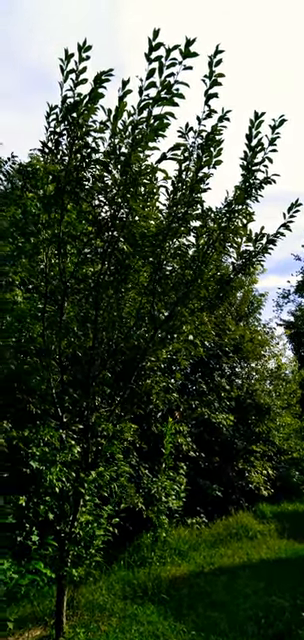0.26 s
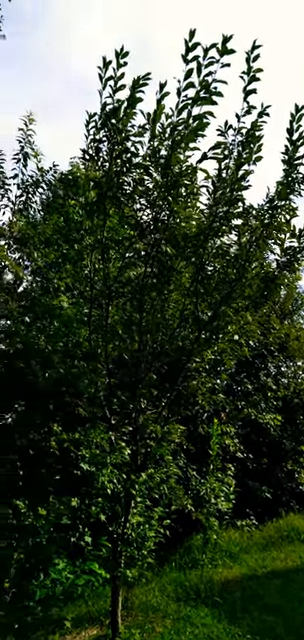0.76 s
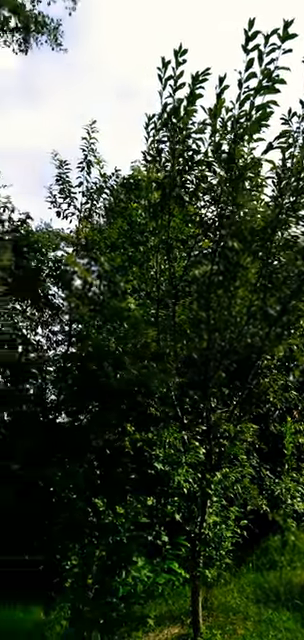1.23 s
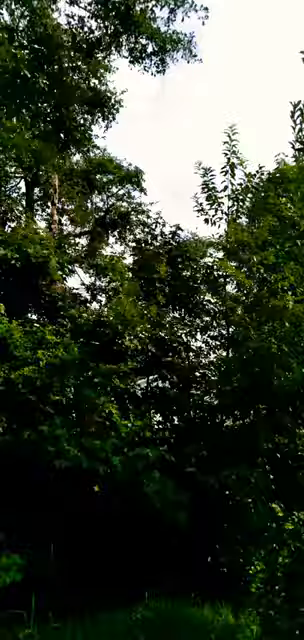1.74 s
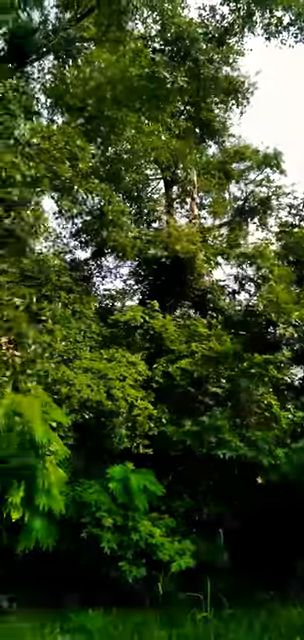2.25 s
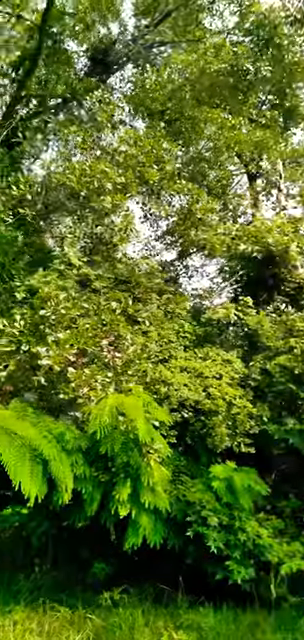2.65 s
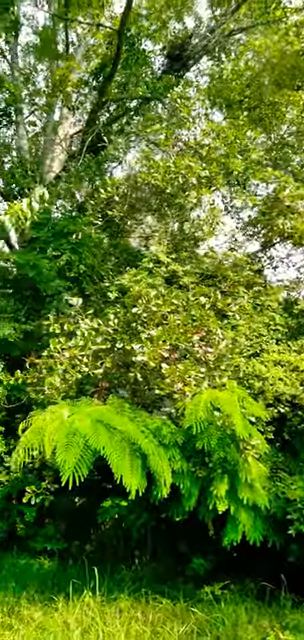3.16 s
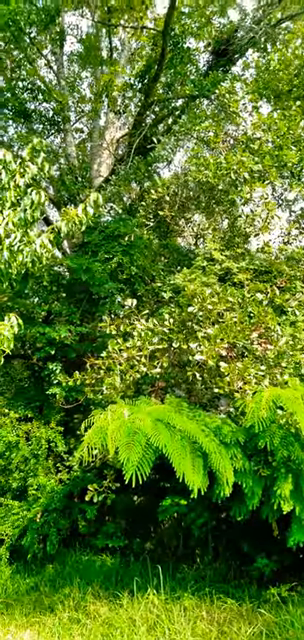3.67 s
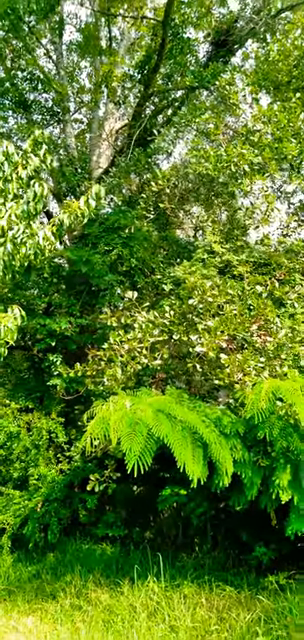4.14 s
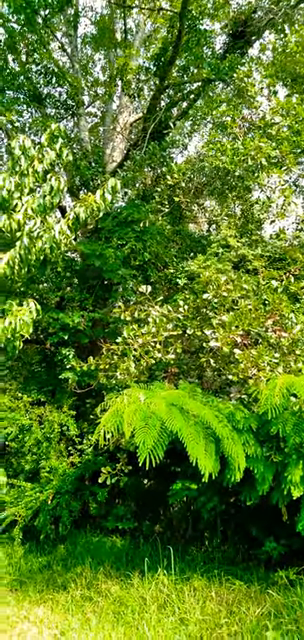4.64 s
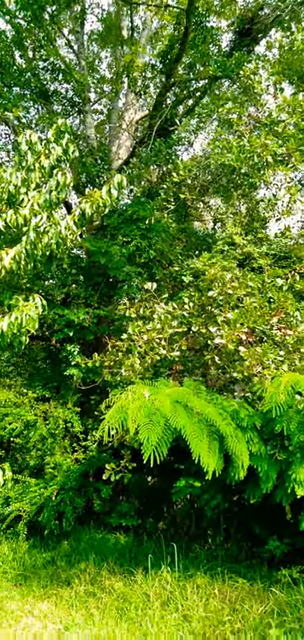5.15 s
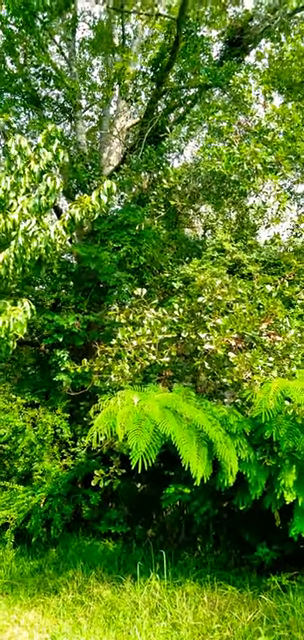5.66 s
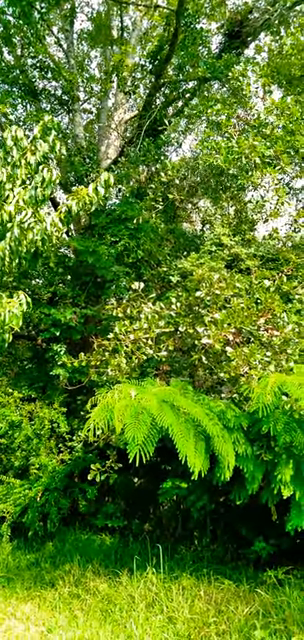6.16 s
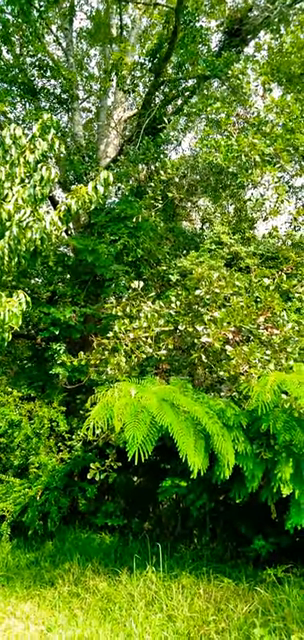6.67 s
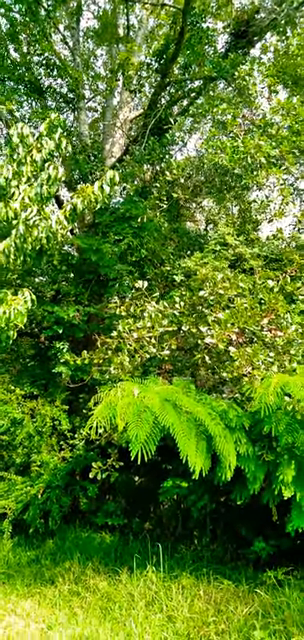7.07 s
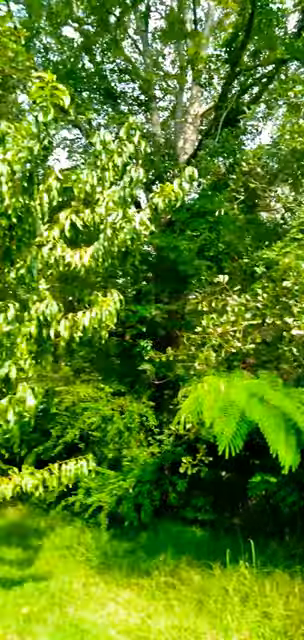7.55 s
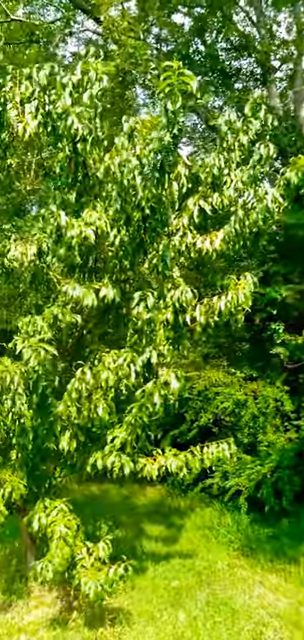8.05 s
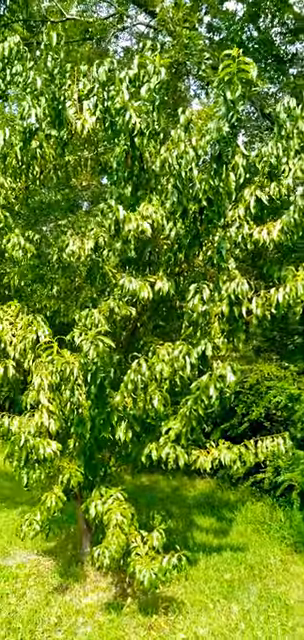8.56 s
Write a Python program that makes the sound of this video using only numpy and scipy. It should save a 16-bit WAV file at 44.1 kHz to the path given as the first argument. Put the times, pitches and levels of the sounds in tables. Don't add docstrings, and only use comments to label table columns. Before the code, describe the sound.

Loud raspy cicada buzz cuts off early among garden trees; thin high drones continue and swell over soft traffic rumble and echoing distant dog barks.

```python
import sys
import numpy as np
from scipy import signal
from scipy.fft import rfft, irfft, next_fast_len
from scipy.io import wavfile
from scipy.ndimage import uniform_filter1d, map_coordinates

SR = 44100
rng = np.random.default_rng(int(sys.argv[2]) if len(sys.argv) > 2 else 0)


def transcribe(u):
    v = np.clip(np.atleast_2d(u).T, -1, 1)
    q = np.round(v * 32767).astype(np.int16)
    wavfile.write(sys.argv[1], SR, q)


def ratio(d):
    e = np.asarray(d, float) / 20
    return 10 ** e


N = 388521


def unit(x):
    return x / np.sqrt(np.mean(x ** 2) + 1e-20)


def along(points, hz):
    f, v = np.transpose(points)
    return np.interp(np.log(hz + 1), np.log(f + 1), v)


def curves(rows):
    s, *cols = np.transpose(rows)
    return [np.interp(np.arange(N) / SR, s, c) for c in cols]


def sounding(rows, fade_s):
    t = np.arange(N) / SR
    since_start = t - rows[0][0] + (rows[0][0] <= 0)
    until_end = rows[-1][0] - t + (rows[-1][0] > 8.7)
    return np.clip(np.minimum(since_start, until_end) / fade_s, 0, 1)


def wobble(rate):
    coarse = np.arange(0, N + 64, 64)
    knots = rng.standard_normal(size=900)
    return np.interp(np.arange(N), coarse, map_coordinates(knots, [coarse * rate / SR]))


def filtered(x, response):
    m = next_fast_len(N + SR // 2)
    return irfft(rfft(x, m) * response(np.fft.rfftfreq(m, 1 / SR)), m)[..., :N]


def body(points):
    return lambda hz: ratio(along(points, hz)) * (hz > points[0][0]) * (hz < points[-1][0])


def sac(centre_hz, width_hz, skirt_db):
    def response(hz):
        bell = np.exp(-.5 * ((hz - centre_hz) / width_hz) ** 2)
        return bell + ratio(skirt_db) / (1 + ((hz - centre_hz) / 900) ** 2)
    return response


def placed(at, size):
    at = np.clip(at, 8, N - 9)
    near = np.floor(at)[:, None] + np.arange(-7, 9)
    offset = near - at[:, None]
    shape = np.sinc(offset) * np.cos(np.pi * offset / 16) ** 2
    return np.bincount(near.astype(int).ravel(), (shape * size[:, None]).ravel(), N)


def clicks(rate_hz, drift, jitter_s, scatter_db, pattern_db=(0,), ahead=0):
    turns = np.cumsum(rate_hz * (1 + drift * wobble(0.99))) / SR + ahead
    k = np.arange(1, int(turns[-1]))
    luck = rng.standard_normal((16000, 2))[:len(k)]
    at = np.interp(k, turns, np.arange(N)) + jitter_s * SR * luck[:, 0]
    level_db = np.asarray(pattern_db)[k % len(pattern_db)] + scatter_db * luck[:, 1]
    return placed(at, ratio(level_db))


def echoes(x, t60, wet_db, sway):
    t = np.arange(int(.8 * SR)) / SR
    tails = rng.standard_normal((4, len(t))) * ratio(-60 * t / abs(t60))
    paths = signal.fftconvolve(x[None], tails / np.linalg.norm(tails[0]), axes=1)[:, :N]
    turn = sway * np.arange(N) / SR + wobble(2.024)
    return x + ratio(wet_db) * (np.cos(turn) * paths[:2] + np.sin(turn) * paths[2:])


def foliage(x, spread_s, change_s, wet_db, fading=.25):
    _, t, z = signal.stft(x, SR, nperseg=2048, noverlap=1536)
    chance = rng.standard_normal((4, 1050, 768))
    delay, rate = np.fft.fftfreq(1050, SR / 2048), np.fft.fftfreq(768, t[1])
    smooth = np.exp(-.5 * (delay[:, None] / spread_s) ** 2 - .5 * (rate * change_s) ** 2)
    field = np.fft.ifft2((chance[:2] + 1j * chance[2:]) * smooth)[:, :z.shape[0], :z.shape[1]]
    field = field / np.abs(field) ** (1 - fading)
    wet = signal.istft(z * field, SR, nperseg=2048, noverlap=1536)[1][:, :N]
    both = unit(x) + ratio(wet_db) * unit(wet)
    return both / np.sqrt(np.abs(uniform_filter1d(both ** 2, size=5000)) + 1e-9)


def place(pair, level_db, pan_db):
    left, right = unit(pair[0]), unit(pair[1])
    return np.array([left * ratio(level_db + pan_db / 2), right * ratio(level_db - pan_db / 2)])


def late_left(pair):
    return np.array([np.roll(pair[0], 4), pair[1]])


def rush(spectrum, alike, lag, patchy_db):
    z = signal.stft(rng.standard_normal((2, N)), nperseg=512)[2]
    field = uniform_filter1d(rng.standard_normal(z.shape[1:]), size=6, axis=0)
    field = uniform_filter1d(field, size=14, axis=1)
    pair = signal.istft(z * ratio(patchy_db * unit(field)), nperseg=512)[1][:, :N]

    def mid_side(hz):
        turn = np.arccos(np.clip(along(alike, hz), -1, 1)) / 2
        return body(spectrum)(hz) * [np.cos(turn), np.sin(turn)]
    mid, side = filtered(pair, mid_side)
    left = filtered(mid + side, lambda hz: np.exp(-2j * np.pi * hz * lag / SR))
    return unit(np.array([left, mid - side]))


def air():
    # hz, level_db per Hz
    air_spectrum = [(130, -2.5), (205, -6), (450, -1), (1100, -1.5), (2000, -6), (3100, -7), (6000, -3.5),
                    (8000, -24), (9700, -2.5), (11600, -36), (13500, -14), (15600, -10.5)]
    # hz, likeness (-1 to 1)
    air_alike = [(60, 0.94), (180, 0.94), (550, 1), (1650, 0.66), (4970, 0.2), (15000, -0.05)]
    level = ratio(-63.5 + 0.15 * wobble(2.02))
    return level * rush(air_spectrum, air_alike, lag=3.07, patchy_db=1.34) * ratio([[1.2], [-1.2]])


def road():
    # hz, level_db per Hz
    rumble = [(28, -44), (45, -14.5), (62, -4.5), (100, -1.5), (140, -8.5), (190, -22), (240, -16)]
    # hz, likeness (0-1)
    road_alike = [(30, .55), (120, .75)]
    # middle_s, half_length_s, level_db
    passes = [
        (1.9, 0.13, -72),
        (2.904, 0.072, -65.5),
        (3.798, 0.33, -63.5),
        (5.214, 0.3, -66.5),
        (6.033, 0.27, -57.5),
        (7.37, 0.23, -63),
        (8.21, 0.22, -65),
    ]
    t = np.arange(N) / SR
    power = ratio(-68.5) ** 2
    for s, half_s, db in passes:
        power = power + ratio(db) ** 2 * np.exp(-((t - s) / half_s) ** 2)
    sway = ratio(2 * wobble(8) - 1.5)
    noise = rush(rumble, road_alike, lag=1.8, patchy_db=0.5)
    return np.sqrt(power) * sway * noise * ratio([[1.5], [-1.5]])


def engines():
    # time_s, pitch_hz, level_db
    firing_notes = [
        [(5.4, 84.83, -75), (5.75, 97.33, -54.5), (5.9, 107.4, -56), (6.3, 106.1, -57), (6.6, 107, -76)],
        [(6.7, 140.4, -89), (7.2, 140, -67), (7.65, 142.5, -64.5), (7.8, 140.4, -74.5), (8.3, 141, -56),
         (8.55, 142, -84)],
        [(7.95, 212.3, -85), (8.2, 229.7, -66.5), (8.45, 232, -74), (8.81, 230, -85)],
    ]
    out = 0
    for rows in firing_notes:
        hz, db = curves(rows)
        turn = 2 * np.pi * np.cumsum(hz * (1 + 0.01017 * wobble(3.9))) / SR
        note = ratio(db + 2.4 * wobble(9)) * np.sin(turn)
        out = out + sounding(rows, 0.044) * note * ratio([[2.5], [-2.5]])
    return out


def hand():
    # middle_s, peak_db, pitch_hz
    bumps = [
        (5.822, -49.5, 158),
        (6.267, -43.5, 109),
        (7.08, -58, 159),
    ]
    t, out = np.arange(N) / SR, np.zeros(N)
    for s, db, hz in bumps:
        out += ratio(db) * np.exp(-.5 * ((t - s) / 0.0049) ** 2) * np.sin(2 * np.pi * hz * (t - s))
    return out * ratio([[3], [-3]])


def bird():
    # start_s, length_s, from_hz, to_hz, level_db
    chirps = [
        (5.093, .03, 6260, 7050, -66),
        (5.184, 0.023, 6020, 6430, -63),
        (5.27, 0.015, 5720, 6500, -61),
        (5.368, 0.016, 5640, 5920, -63),
        (5.867, 0.026, 6140, 7260, -55.5),
        (3.25, 0.64, 3140, 3230, -70.5),
        (4.385, 0.42, 2500, 2650, -74),
        (7.482, 0.19, 4520, 4540, -76),
    ]
    t, out, waver_hz = np.arange(N) / SR, np.zeros(N), 75 * wobble(55)
    for s, length, from_hz, to_hz, db in chirps:
        u = np.clip((t - s) / length, 0, 1)
        turn = 2 * np.pi * np.cumsum(from_hz + (to_hz - from_hz) * u + waver_hz) / SR
        out += ratio(db) * np.sin(np.pi * u) ** 0.15 * np.sin(turn)
    return echoes(out, t60=0.41, wet_db=4.0, sway=0.18) * ratio([[3], [-3]])


def dog():
    # start_s, level_db, voice_hz, chest_db, roughness (0-1)
    barks = [
        (2.045, -51.5, 934, -12.5, 0.41),
        (2.658, -52.5, 875, -2.5, 0.38),
        (4.6, -58, 834.5, 5.5, 0.77),
        (8.48, -70.5, 792, -25, 0.77),
    ]
    t, low, high = np.arange(SR // 2) / SR, np.zeros(N + SR), np.zeros(N + SR)
    for s, db, hz, chest_db, rough in barks:
        pitch_rasp, chest_rasp, level_rasp = [wobble(140)[:len(t)] for _ in range(3)]

        def swell(lag_s):
            rise_fall = np.sin(np.pi * np.clip((t - lag_s) / 0.3, 0, 1) ** 0.5) ** 2
            return ratio(db + 6 * rough * level_rasp) * rise_fall
        pitch = 1 - .16 * rough * np.exp(-t / .09) + .065 * rough * pitch_rasp
        turn = 2 * np.pi * np.cumsum(pitch) / SR
        chest = np.sin(2 * np.pi * np.cumsum(553.5 * (1 + .055 * chest_rasp)) / SR)
        chest = ratio(chest_db - 103 * t) * swell(-0.014) * chest
        husk = ratio(-8) * swell(0.07) * np.sin(1014 * turn)
        voice = swell(0.018 + 0.032 * rough ** 2) * np.sin(hz * turn)
        octave = swell(0.048) * ratio(-9.5) * np.sin(2 * hz * turn)
        low[round(s * SR):][:len(t)] += voice + husk + chest
        high[round(s * SR):][:len(t)] += octave
    left, right = echoes(low[:N], t60=1.1, wet_db=6, sway=.3) + echoes(high[:N], t60=.5, wet_db=4, sway=.3)
    return np.array([ratio(1.2) * np.roll(.72 * right + .45 * left, 3), ratio(-1.2) * right])


def katydid_beat():
    # time_s, slip_beats
    throb_slip = [(1.4, -.08), (2.9, -.2), (3.8, -.8), (4.3, -1.5)]
    turn = 14.1 * np.arange(N) / SR + curves(throb_slip)[0]
    return (.5 + .5 * np.cos(2 * np.pi * turn)) ** 3.3


def katydid(beat):
    # time_s, level_db
    throb = [(1.4, -72), (1.8, -61), (2.2, -59), (2.6, -63), (2.9, -71), (3.3, -83), (3.9, -78), (4.3, -84)]
    # hz, level_db per Hz
    throb_body = [(3800, -23), (4300, -7.5), (4800, -9), (5100, 5), (5450, -13), (6100, -1), (6700, -6),
                  (7100, -12)]
    teeth = clicks(900, drift=.02, jitter_s=0.00034, scatter_db=3.5)
    rasp = echoes(filtered(teeth * beat, body(throb_body)), t60=0.046, wet_db=0.5, sway=3.2)
    return sounding(throb, 0.21) * place(rasp, curves(throb)[0], 9.3)


def far_buzzers(beat):
    # time_s, level_db, left_right_db
    far_path = [(1.2, -46, 13), (1.45, -50.5, 6), (2.0, -52, 4.5), (2.7, -53.5, 8.5), (3.2, -56, 8),
                (4.0, -61, 9), (4.5, -68.5, 10), (5.2, -74, 0)]
    # hz, level_db per Hz
    far_body = [(2200, -19), (3600, -14), (4600, -14.5), (5200, -6), (6800, -5), (7600, -2.5),
                (8700, -15.5), (10500, -21), (12300, -19), (14000, -37)]
    far = filtered(clicks(480, drift=.01, jitter_s=0.0001365, scatter_db=2.5), body(far_body))
    far = foliage(far * ratio(1.06 * wobble(24.96)), spread_s=0.0077, change_s=0.46, wet_db=11, fading=0.79)
    level_db, pan_db = curves(far_path)
    return sounding(far_path, 0.34) * place(far * (1 + 0.044 * beat), level_db + 2.0, pan_db)


def crowd():
    # time_s, level_db
    crowd_level = [(0.0, -50), (1.4, -51), (3.0, -52), (4.3, -51), (6.8, -49), (8.81, -51.5)]
    many = clicks(1500, drift=0.018, jitter_s=0.00055, scatter_db=3.0) * ratio(0.49 * wobble(40))
    many = filtered(many, sac(8010, 340, skirt_db=-4.5))
    many = foliage(many, spread_s=0.013, change_s=0.15, wet_db=3)
    return late_left(place(many, curves(crowd_level)[0], 0.5))


def steady_singer():
    # time_s, level_db, left_right_db
    song = [(5.2, -78, -6), (6, -72, -24), (6.5, -65, -22.5), (7, -52.5, -10), (7.5, -54.5, -4.5),
            (7.9, -55.5, 2), (8.3, -55.5, -1), (8.81, -53.5, -6)]
    # hz, level_db
    low_band = [(4400, -20), (5000, -11), (5450, -13), (5750, 0), (6250, -1.5), (6750, 4.5), (7000, 1),
                (7600, -30)]
    # hz, level_db
    top_band = [(8700, -10), (9300, -0.5), (9900, -15.5), (10500, -2.5), (11100, -8.5), (11700, -33)]
    # time_s, comb_db
    opening = [(5.2, -22), (6.6, -19), (7.3, -5.5), (7.9, 2.5), (8.81, 0.5)]
    # hz, level_db
    first_lines = [(6500, 1), (10500, -10.5)]
    # time_s, level_db
    young = [(5.2, -81), (5.65, -72), (6.4, -70.5), (7.2, -65.5), (8.81, -82)]
    # time_s, level_db
    passing = [(5.7, -88), (5.9, -75), (6.5, -76), (6.75, -78)]
    # time_s, rate_clicks_per_s
    pace = [(5.2, 250.1), (7, 250), (8, 249.5), (8.81, 248.8)]
    even = clicks(curves(pace)[0], drift=0.0003, jitter_s=.000011, scatter_db=1.5)
    train = foliage(even, spread_s=0.0093, change_s=0.66, wet_db=16, fading=0.6)
    level_db, pan_db = curves(song)
    comb_db = curves(opening)[0]

    def lines(rows):
        def response(f):
            return sum(ratio(db) * np.exp(-.5 * ((f - hz) / 70) ** 2) for hz, db in rows)
        return filtered(unit(even) + 0.11 * train, response)
    low = place(filtered(train, body(low_band)), level_db + comb_db, pan_db)
    top_db = level_db + 0.61 * comb_db - 6.5
    top = place(filtered(train, body(top_band)), top_db, pan_db - 11.0)
    first = place(lines(first_lines), curves(young)[0], pan_db - 1.5)
    brief = place(lines([(4750, 4), (12250, -16)]), curves(passing)[0], -1.5)
    return sounding(song, 0.31) * (low + top + first) + sounding(passing, 0.09) * brief


def high_soloist():
    # time_s, level_db
    solo_level = [(0.0, -56), (0.7, -70), (1.3, -56), (1.9, -66), (2.5, -62), (3.3, -52), (3.6, -51),
                  (4.15, -55), (4.8, -49.5), (5.0, -57), (5.5, -50), (5.9, -46.5), (6.35, -46.5),
                  (6.75, -58), (7.7, -51.5), (8.1, -61.5), (8.3, -47.5), (8.81, -50.5)]
    ribs = [-2.5, -4, -15.5, -19, -1.5, -4.5, -5.5, -16, -10.5, -11]
    # time_s, slip_cycles
    solo_slip = [(0, 0), (2.8, .7), (4.3, .76), (5.2, 1.2), (5.56, 1.27), (5.62, .75), (6.16, .77),
                 (6.22, .31), (6.5, .38), (7, .62), (8.81, .67)]
    ahead = len(ribs) * curves(solo_slip)[0] - 0.8
    train = clicks(297, drift=0, jitter_s=.000025, scatter_db=1.5, pattern_db=ribs, ahead=ahead)
    high = filtered(train, sac(8138, 178, skirt_db=-36))
    high = foliage(high, spread_s=0.0031, change_s=0.17, wet_db=4.0, fading=0.17)
    flutter_db = 1.6 * wobble(5.2)
    return late_left(place(high, curves(solo_level)[0] + flutter_db, 18.5))


def bursts(scatter_db):
    # lag_s, level_db
    rib_clicks = [(0, 2), (.00426, -6), (.00852, -10)]
    burst_s, rest_s, rest_varies_s, triples = .0141, .0195, .008, .45
    luck = rng.random((260, 2))
    third = luck[:, 0] < triples
    start = np.cumsum(burst_s * (1 + third) + rest_s + rest_varies_s * luck[:, 1]) - .08
    start = np.concatenate([start, start + burst_s, (start - burst_s)[third]])
    start = start + .0002 * rng.standard_normal(800)[:len(start)]
    start = start[(start > 0) & (start < N / SR - .02)]
    lag, db = np.transpose(rib_clicks)
    uneven = rng.standard_normal((800, 1)) + .6 * rng.standard_normal((800, 3))
    size = ratio(db + scatter_db * uneven[:len(start)])
    return placed(((start[:, None] + lag) * SR).ravel(), size.ravel())


def low_droner():
    # time_s, level_db, left_right_db
    low_path = [(0.0, -43, 9), (0.6, -44.5, 19.5), (1.2, -45, 20.5), (1.6, -53.5, 20.5), (2.0, -57, 13),
                (2.35, -50.5, 4), (3.1, -52.5, 5), (3.5, -58, 11), (3.9, -43, 17)]
    low = filtered(bursts(scatter_db=1.0), sac(7590, 160, skirt_db=-15))
    low = foliage(low, spread_s=0.0026, change_s=0.27, wet_db=8.5)
    level_db, pan_db = curves(low_path)
    return sounding(low_path, 0.77) * place(low, level_db - 1.5, pan_db + 2.2)


def near_buzzer():
    # time_s, level_db, left_right_db
    buzz_path = [(0.0, -33.5, 4), (0.35, -34.5, 3), (1.15, -37.5, 3.5), (1.29, -40.5, 3), (1.37, -48, 1.5),
                 (1.6, -44, 0)]
    # hz, level_db per Hz
    buzz_body = [(2000, 27.5), (2550, -17.5), (3000, -13), (3400, -5), (3800, -7.5), (4300, -5.5),
                 (5300, -1), (6300, 0.5), (7000, -4), (8200, -28), (9600, -14), (10700, -22),
                 (12200, -13.5), (14400, -22), (14600, -30)]
    # time_s, lowest_hz
    buzz_edge = [(0, 2440), (.5, 2590), (.75, 2690), (1.1, 2840), (1.6, 2970)]
    # hz, left_right_db
    buzz_lean = [(2500, 6), (5000, 0), (7000, 6.5), (9000, -7), (13000, -4.5)]
    near = filtered(clicks(720, drift=.02, jitter_s=0.000409, scatter_db=2.5), body(buzz_body))
    hz, t, z = signal.stft(near, SR, nperseg=512)
    edge_hz = np.interp(t, *np.transpose(buzz_edge))
    near = signal.istft(z / (1 + np.exp((edge_hz - hz[:, None]) / 35)), SR, nperseg=512)[1][:N]
    near = foliage(near * ratio(0.72 * wobble(28.7)), spread_s=0.0077, change_s=0.096, wet_db=20.5, fading=.05)
    near = filtered(near, lambda hz: ratio(np.outer([.5, -.5], along(buzz_lean, hz))))
    level_db, pan_db = curves(buzz_path)
    return sounding(buzz_path, 0.24) * place(near, level_db + 0.4, pan_db)


def scene():
    beat = katydid_beat()
    background = air() + road() + engines() + hand()
    animals = bird() + dog() + katydid(beat)
    cicadas = far_buzzers(beat) + crowd() + steady_singer() + high_soloist() + low_droner() + near_buzzer()
    return background + animals + cicadas


def roll_off(x):
    return signal.sosfilt(signal.butter(12, 15720, fs=SR, output="sos"), x)


def record(dry):
    return roll_off(dry)


dry = scene()
out = record(dry)
transcribe(out)
```